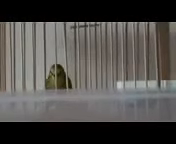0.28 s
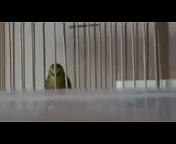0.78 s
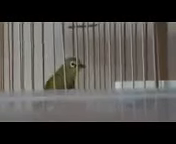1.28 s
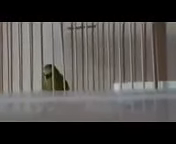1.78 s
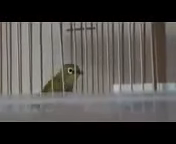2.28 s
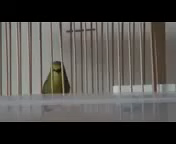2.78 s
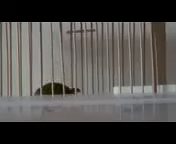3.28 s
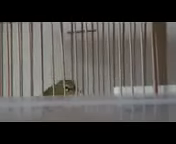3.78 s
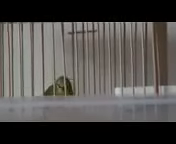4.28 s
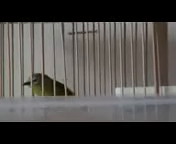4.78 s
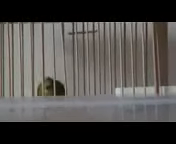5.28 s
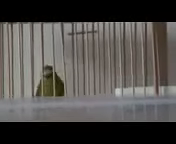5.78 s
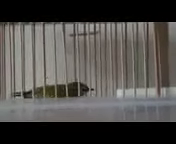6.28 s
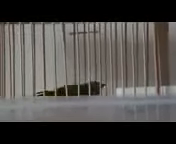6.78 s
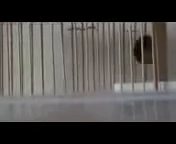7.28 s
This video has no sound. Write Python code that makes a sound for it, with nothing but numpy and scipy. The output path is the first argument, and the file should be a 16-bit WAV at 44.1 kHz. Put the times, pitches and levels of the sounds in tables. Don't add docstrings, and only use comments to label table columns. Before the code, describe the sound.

Indoors, a steady low fan rush with duct resonance and motor hum lies under birdsong. A near bird sings fast, nearly pure chirps and swooping whistles in the opening seconds, loudest at around two and a half. Then only the fan, until a more distant, reedier bird gives sparse sagging replies. Hard walls add short echoes; the phone sound is narrow and slightly grainy.

```python
import sys
import numpy as np
from scipy import signal
from scipy.fft import rfft, irfft, next_fast_len
from scipy.io import wavfile
from scipy.ndimage import uniform_filter1d, map_coordinates

SR = 44100
rng = np.random.default_rng(int(sys.argv[2]) if len(sys.argv) > 2 else 0)


def digitize_waveform(pressure):
    field = np.atleast_2d(pressure).T
    bounded = np.clip(field, -1, 1)
    quanta = np.round(bounded * 32767).astype(np.int16)
    wavfile.write(sys.argv[1], SR, quanta)


def gain_from_db(level_db):
    decades = np.asarray(level_db, float) / 20
    return 10 ** decades


N = 331191


def unit(x):
    return x / np.sqrt(np.mean(x ** 2) + 1e-20)


def along(points, hz):
    f, v = np.transpose(points)
    return np.interp(np.log(hz + 1), np.log(f + 1), v)


def filtered(x, response):
    m = next_fast_len(N + 8192)
    return irfft(rfft(x, m) * response(np.fft.rfftfreq(m, 1 / SR)), m)[..., :N]


def wobble(rate):
    knots = rng.standard_normal(int(N * rate / SR) + 4)
    return map_coordinates(knots, [np.arange(N) * rate / SR])


# pitch in Hz, level in dB.
THROAT = [(2000, -7), (2800, 0.5), (4000, -1), (5200, -1.5), (6500, -15)]


def whistle(row, kind, overtone, edge, flutter_db):
    start, length, from_hz, to_hz, db = row
    haste, crest, lead_db, trail_db, boost_db = kind
    t = np.arange(0, length, 1 / SR)
    glide = np.expm1(-haste * t / length) / np.expm1(-haste)
    pitch = from_hz + (to_hz - from_hz) * glide
    phase = 2 * np.pi * np.cumsum(pitch) / SR

    swell_db = np.interp(t / length, [0, np.clip(crest, 0, 1), 1], [-lead_db, 0, -trail_db])
    fade = np.clip(np.minimum(t, length - t) / edge, 0, 1)
    at = round(start * SR)
    level_db = db + swell_db + along(THROAT, pitch) + flutter_db[at:][:len(t)]
    level = gain_from_db(level_db) * np.sin(np.pi / 2 * fade) ** 2
    octave = gain_from_db(along(overtone, pitch) + boost_db) * np.sin(2 * phase)
    return at, np.sqrt(2) * level * (np.sin(phase) + octave)


# frequency in Hz, time to fall 60 dB in seconds.
WALLS = [(2000, 0.39), (3500, 0.49), (5500, 0.52), (8000, 0.16)]


def room(x, gap):
    hz, t, z = signal.stft(rng.standard_normal(SR * 3 // 5), SR, nperseg=256)
    decay = gain_from_db(-60 * t / along(WALLS, hz)[:, None])
    tail = signal.istft(z * decay, SR, nperseg=256)[1]
    tail = tail * np.clip(np.arange(len(tail)) / SR / gap, 0, 1)
    return signal.fftconvolve(x, tail / np.linalg.norm(tail))


def bird(song, overtone, direct_db, wet_db, gap, flutter_db):
    out = np.zeros(N + 2 * SR)
    flutter = flutter_db * wobble(110)
    for kind, notes in song:
        for row in notes:
            start, note = whistle(row, kind, overtone, edge=.004, flutter_db=flutter)
            echoes = room(note, gap)
            out[start:start + len(note)] += gain_from_db(direct_db) * note
            out[start:start + len(echoes)] += gain_from_db(wet_db) * echoes
    return out[:N]


# haste (above 0 glides early then settles, below 0 holds then
# glides), share of the note at its peak (clipped to 0-1), drop at start in dB, drop at end in dB, overtone
# boost in dB.
FLICK = (0.5, 0, 5, 8.5, -3)
LEAP = (1, -1.1, 3.5, -1, 0.5)
DIVE = (3, 1.2, 7.5, 2, 0.5)
CLIMB = (0.67, .4, 10.5, 16.5, 0.5)
ARCH = (3, 0, 7.5, 7.5, 1.5)
SLUR = (-1.06, 0.8, 1.5, 7, 1)
# start in seconds, length in seconds, from Hz, to Hz, level in dB.
FLICKS = [(0, 0.027, 3720, 2950, -32.5), (0, .052, 2930, 1875, -22), (.268, .011, 4700, 2320, -28),
          (0.28, .026, 4280, 3230, -21), (.459, .011, 4500, 3700, -27.5), (1.224, 0.023, 2470, 1950, -32),
          (1.39, 0.045, 4000, 3320, -41.5), (1.543, .026, 5325, 2920, -19.5),
          (2.078, 0.024, 4610, 1885, -22.5), (2.122, 0.013, 2200, 3880, -28.5),
          (2.503, 0.022, 3815, 1970, -18)]
LEAPS = [
    (1.01, 0.019, 2250, 4110, -23),
    (1.524, .014, 3680, 5270, -22.5),
    (2.054, 0.021, 2567, 5140, -20.5),
    (2.465, 0.012, 5070, 6560, -22),
]
DIVES = [
    (1.025, .042, 4100, 2850, -16),
    (2.471, .03, 6300, 3850, -11),
    (1.42, 0.043, 3500, 3170, -36),
]
CLIMBS = [
    (0.081, 0.075, 2248, 3243, -25),
    (0.204, 0.033, 2100, 3030, -33),
    (.245, .036, 3600, 4140, -28),
    (2.554, 0.11, 2100, 2820, -17.5),
    (2.65, 0.097, 2713, 3400, -15),
]
ARCHES = [
    (.215, 0.046, 4400, 5500, -26),
    (.648, .1, 2150, 2643, -21),
    (1.29, 0.044, 2360, 2740, -24.5),
    (1.56, 0.039, 2790, 2863, -29),
    (2.032, 0.028, 2540, 2690, -30),
    (0.47, 0.041, 3680, 4030, -20),
]
SLURS = [
    (0.514, 0.06, 3850, 2610, -25.5),
    (1.329, 0.07, 2627, 1924, -25),
    (1.618, .045, 3443, 3214, -21.5),
    (1.648, 0.083, 3332, 2647, -19),
    (2.163, .055, 3934, 3690, -20),
    (2.22, 0.092, 3700, 3070, -22.5),
    (2.294, 0.045, 3094, 3260, -20.5),
]
# pitch in Hz, octave overtone in dB.
PURE = [(3000, -45.5)]


def near_bird():
    song = [(FLICK, FLICKS), (LEAP, LEAPS), (DIVE, DIVES), (CLIMB, CLIMBS), (ARCH, ARCHES), (SLUR, SLURS)]
    return bird(song, PURE, direct_db=-4.5, wet_db=-1.5, gap=.004, flutter_db=3.0)


# haste, share of the note at its peak (clipped to 0-1), drop at
# start in dB, drop at end in dB, overtone boost in dB.
PLUNGE = (-0.5, 1.7, 0, 9.5, 2)
SWOOP = (1.4, 0.11, 1.3, 11, 4.4)
SAG = (-2.6, 1, 2, 7, -7)
DRIFT = (0.9, 0.4, 6, 9.5, -7)
LIFT = (-1.5, 1, 5.5, 4, -12)
# start in seconds, length in seconds, from Hz, to Hz, level in dB.
PLUNGES = [
    (5.305, .022, 4600, 3790, -37),
    (5.552, .014, 5670, 3800, -25.5),
    (5.736, .013, 5700, 3790, -26.5),
]
SWOOPS = [
    (5.322, .045, 3840, 3230, -34.5),
    (5.562, .092, 3955, 3120, -26),
    (5.75, .105, 3947, 3060, -25),
]
SAGS = [
    (3.599, 0.038, 3278, 2590, -34),
    (3.81, .065, 3282, 2480, -35.5),
    (3.981, 0.052, 3393, 2303, -35.5),
    (4.656, .085, 3090, 2727, -32),
    (5.352, .065, 3287, 2590, -31.5),
]
DRIFTS = [
    (4.028, .22, 3330, 2867, -38.5),
    (4.609, 0.055, 3950, 2950, -34.5),
    (4.727, .075, 2814, 1897, -33),
    (4.996, .12, 3400, 2502, -34),
]
LIFTS = [
    (5.42, 0.081, 3200, 3850, -32.5),
]
# pitch in Hz, octave overtone in dB.
REED = [(2300, -6), (3100, -10), (3850, -17), (4400, -37)]


def far_bird():
    answer = [(PLUNGE, PLUNGES), (SWOOP, SWOOPS), (SAG, SAGS), (DRIFT, DRIFTS), (LIFT, LIFTS)]
    return bird(answer, REED, direct_db=-7.5, wet_db=-1.4, gap=.003, flutter_db=3.5)


# frequency in Hz, level in dB per Hz.
AIR = [(15, -62), (25, -33.5), (76, -28), (145, -16), (234, -12.5), (336, -6.5), (388, -17.5), (506, -14.5),
       (585, -20.5), (659, -13.5), (799, -18.5), (2250, -24), (3230, -29.5), (7860, -41), (10200, -79),
       (17300, -120)]
# frequency in Hz, width in Hz, level in dB.
DUCT = [(112.4, 25, -11.5), (152.1, 14, -3.5), (203.5, 20, -2.5), (263.7, 16, -3), (280.7, 16, -8.5),
        (354.2, 35, -4), (502, 18, -11.5), (644.5, 40, -8.5), (906, 63, -14)]
# frequency in Hz, level in dB.
MOTOR = [(333.8, -39), (667.5, -51.5), (1599, -54.5), (2207, -64.5), (2266, -55), (2519, -67.5)]


def fan():
    def ducts(f):
        power = sum(gain_from_db(2 * level) / (1 + ((f - hz) / w * 2) ** 2) ** 2 for hz, w, level in DUCT)
        return np.sqrt(power)

    rush = unit(filtered(rng.standard_normal(N), lambda hz: gain_from_db(along(AIR, hz))))
    hum = unit(filtered(rng.standard_normal(N), ducts))
    turns = np.arange(N) / SR + .00015 * wobble(6)
    tones = np.zeros(N)
    for hz, level in MOTOR:
        tones += gain_from_db(level + 3 * wobble(7)) * np.sqrt(2) * np.sin(2 * np.pi * hz * turns)
    draught = gain_from_db(-30 + .3 * wobble(2.074))
    return draught * (gain_from_db(-3.0) * rush + gain_from_db(-5) * hum) + tones


def scene():
    near = near_bird()
    far = far_bird()
    return (near + far + fan())[None]


# frequency in Hz, step in dB.
COARSE = [(150, -16), (1200, -8), (2500, 1), (4000, 6.5), (8000, 8.5)]


def thin_and_mask(x, up_db, down_db, margin_db, fickle_db, finest_db):
    hop, band = 1024, 16
    blocks = len(x) // 441 + 1
    low = signal.resample(np.pad(x, (0, blocks * 441 - len(x))), blocks * 160)
    low = np.pad(low, (hop, 2 * hop))

    n, k = np.arange(2 * hop) + .5, np.arange(hop) + .5
    window = np.sin(np.pi * n / hop / 2)[:, None]
    basis = window * np.cos(np.pi / hop * np.outer(n + hop / 2, k)) * np.sqrt(2 / hop)
    lines = np.lib.stride_tricks.sliding_window_view(low, 2 * hop)[::hop] @ basis

    hz = (np.arange(hop // band) + .5) * band * 8000 / hop
    power = np.mean(lines.reshape(len(lines), -1, band) ** 2, axis=2)
    level_db = 10 * np.log10(power + 1e-20)
    octaves = np.log2(hz[None] / hz[:, None])
    skirt_db = np.where(octaves > 0, -up_db * octaves, down_db * octaves) - margin_db
    heard = level_db > np.max(level_db[:, :, None] + skirt_db, axis=1)

    budget = unit(uniform_filter1d(rng.standard_normal(level_db.shape), size=2, axis=0))
    step_db = np.median(level_db, axis=0) + along(COARSE, hz) + fickle_db * budget
    step = np.repeat(gain_from_db(np.maximum(step_db, level_db - finest_db)), band, axis=1)
    rounded = np.sign(lines) * np.floor(np.abs(lines) / step + .42) * step
    kept = np.repeat(heard, band, axis=1) * rounded

    frames = kept @ basis.T
    joined = (frames[:-1, hop:] + frames[1:, :hop]).ravel()[:blocks * 160]
    return signal.resample(joined, blocks * 441)[:N]


def band_limit(x):
    return signal.sosfilt(signal.butter(12, 8010, fs=SR, output="sos"), x)


def record(dry):
    phone = thin_and_mask(dry[0], up_db=47, down_db=130, margin_db=9, fickle_db=4, finest_db=13)
    mix = filtered(phone, lambda hz: 1 / (1 + (hz / 8000) ** 200))
    return band_limit(mix[None])


dry = scene()
out = record(dry)
digitize_waveform(out)
```